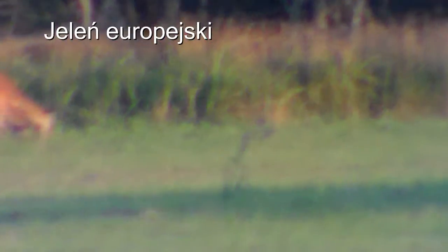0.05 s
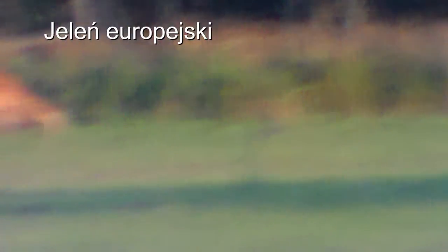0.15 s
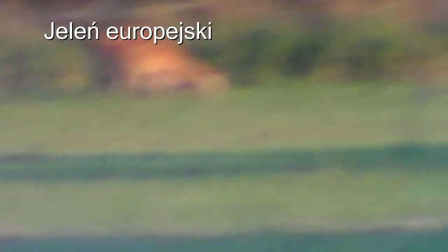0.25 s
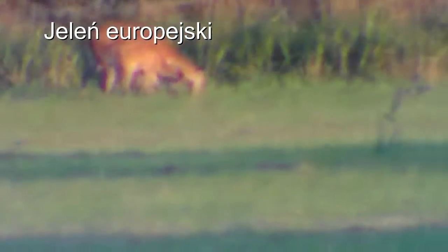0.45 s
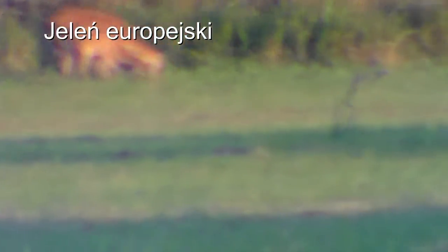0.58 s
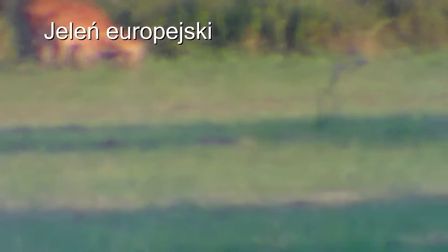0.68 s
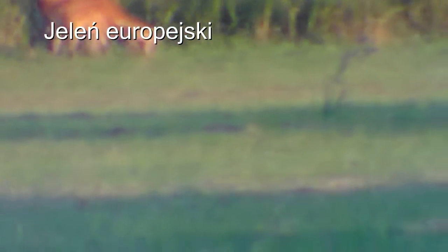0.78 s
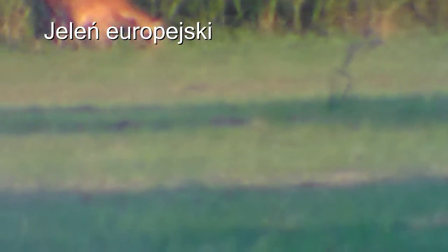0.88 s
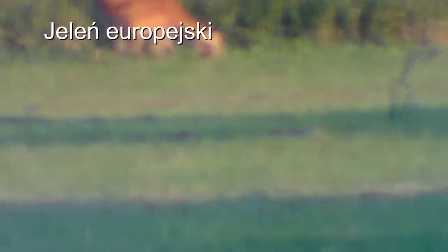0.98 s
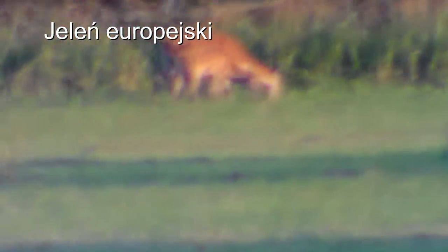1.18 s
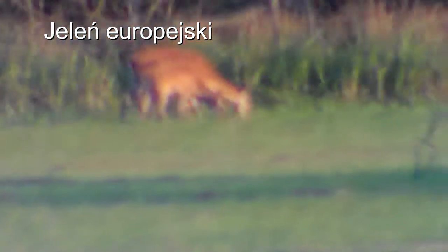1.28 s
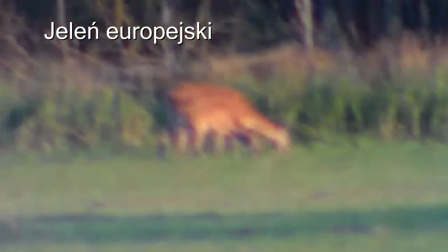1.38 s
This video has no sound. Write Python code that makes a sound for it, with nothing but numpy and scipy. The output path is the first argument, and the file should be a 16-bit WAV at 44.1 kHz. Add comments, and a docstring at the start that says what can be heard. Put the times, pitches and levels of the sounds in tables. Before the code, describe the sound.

Two brief, high deer barks, the second softer, echo lightly over faint outdoor hiss.

```python
"""Deer barking across a field

A deer gives two short, high barks, each arching up in pitch and back, hoarse at its edges: the throat
filters the harmonics of the vocal folds, and turbulent breath excites its resonances. The edge of the
wood answers with echoes, and a few soft rustles follow. Close by, a camera's drive throbs and ticks
faintly over quiet outdoor air, hiss and rumble."""
import sys
import numpy as np
from scipy import signal
from scipy.fft import rfft, irfft, next_fast_len
from scipy.io import wavfile
from scipy.ndimage import map_coordinates

SR = 44100
rng = np.random.default_rng(int(sys.argv[2]) if len(sys.argv) > 2 else 0)


def master_out(mix):
    """Clip the mix to full scale and print it as 16-bit PCM to the path in sys.argv[1]."""
    frames = np.transpose(np.atleast_2d(mix))
    ceiling = np.clip(frames, -1, 1)
    pcm = np.round(ceiling * 32767).astype(np.int16)
    wavfile.write(sys.argv[1], SR, pcm)


N = 63945
TOP_HZ = 14250  # upper band limit


def amp(db):
    """Decibels to amplitude ratio."""
    return 10 ** (np.asarray(db) / 20)


def unit(x):
    """Normalise to rms 1."""
    return x / np.sqrt(np.mean(x ** 2) + 1e-20)


def along(points, hz):
    """Interpolate (frequency [Hz], value) points on a logarithmic frequency axis."""
    f, v = np.transpose(points)
    return np.interp(np.log(hz + 1), np.log(f + 1), v)


def clock():
    """Time [s] at each sample."""
    return np.arange(N) / SR


def wobble(rate):
    """Smooth random modulation: a spline through `rate` Gaussian knots a second."""
    return map_coordinates(rng.standard_normal(N), [clock() * rate])


def filtered(x, response):
    """Linear filtering: the spectrum of x times a frequency response."""
    m = next_fast_len(N + SR // 2)
    return irfft(rfft(x, m) * response(np.fft.rfftfreq(m, 1 / SR)), m)[..., :N]


def strike(start, attack, t60):
    """Envelope of a damped transient: a rise, then exponential decay by 60 dB in t60 seconds."""
    t = np.maximum(clock() - start, 0)
    return (1 - np.exp(-t / attack)) * np.exp(-np.log(1000) * t / t60)


def outdoor_air(level_db=-54, low_cut_hz=53.7):
    """Partly coherent noise: air and hiss widen toward the treble as left-right correlation falls."""
    # noise spectrum: (frequency [Hz], relative spectral density [dB])
    spectrum = [(53, -9), (90, 0), (487, -7.5), (530, -8.5), (577, -10), (958, -12.5), (1130, -13),
                (1730, -14.5), (3130, -16.5), (3620, -16), (4030, -17.5), (14000, -22)]
    # likeness of left and right: (frequency [Hz], correlation [0-1])
    coherence = [(60, 0), (150, 0.61), (400, 0.36), (1200, 0.14), (4000, 0.08), (12000, 0)]

    def mid_side_response(f):
        angle = np.arccos(along(coherence, f)) / 2
        colour = amp(along(spectrum, f)) * f / np.hypot(f, low_cut_hz) * (f < TOP_HZ)
        return colour * np.array([np.cos(angle), np.sin(angle)])

    mid, side = filtered(rng.standard_normal((2, N)), mid_side_response)
    return amp(level_db) * unit(np.array([mid + side, mid - side]))


def rumble(level_db=-59.5, edge_hz=44.6):
    """Incoherent low-frequency noise: a faint rumble, independent in each channel."""
    noise = rng.standard_normal((2, N))
    return amp(level_db) * unit(filtered(noise, lambda f: f / (1 + (f / edge_hz) ** 4)))


def drive_throb(first_s=.035, period_s=.03995, full_from_s=.13, width_s=.0037):
    """A pulse train: the camera's drive beats in smooth Gaussian pulses, heard as a low throb."""
    t = clock()
    pulses = np.zeros(N)
    for beat in np.arange(first_s, t[-1], period_s):
        db = -40.5 - 6 * (beat < full_from_s) + rng.normal(0, 1)  # the first beats are weaker
        centre = beat + rng.normal(0, .0015)
        pulses -= amp(db) * np.exp(-.5 * ((t - centre) / width_s) ** 2)
    return filtered(pulses, lambda f: f ** 2 / (f ** 2 + 10 ** 2))  # 10 Hz high-pass


def bark(contour, throat, rasp, ending, voice_db, rasp_db, rasp_follows, puff_depth):
    """Source and filter: the throat shapes vocal-fold harmonics and breath puffed out once a cycle."""
    clear_hz, hoarse_db_per_octave = 516, 16.5  # the lower the pitch, the hoarser the voice
    jitter, shimmer_db, knots_per_s = .00427, .65, 260  # pitch and level scatter at the clear pitch
    edge_s, ring_rise_s, flutter_hz, flutter_grow_s = .0055, .0045, 76.6, .018
    dispersion_rad = .675  # the throat delays each harmonic more than the last
    t = clock()
    times, *columns = np.transpose(contour)
    pitch, level, tilt, breath_db = [np.interp(t, times, column) for column in columns]
    ending_s, ring_hz, ring_width, ring_db, flutter_depth = ending
    late = t - ending_s
    outside_s = np.maximum(np.maximum(times[0] - t, t - times[-1]), 0)
    gate = np.exp(-(outside_s / edge_s) ** 2)
    hoarse = amp(hoarse_db_per_octave * np.log2(clear_hz / pitch))
    phase = 2 * np.pi * np.cumsum(pitch * (1 + jitter * hoarse * wobble(knots_per_s))) / SR

    k = np.arange(1, 15)[:, None]  # harmonic numbers
    ring_onset = .5 * (1 + np.tanh(late / ring_rise_s))
    ring = ring_db * np.exp(-((k * pitch - ring_hz) / ring_width) ** 2) * ring_onset
    gains = amp(along(throat, k * pitch) + tilt * np.log2(k) + ring)
    gains /= np.sqrt(np.sum(gains ** 2, 0) / 2)  # unit total power
    voice = np.sum(gains * np.cos(k * phase - dispersion_rad * k ** 2), 0)
    flutter_onset = np.clip(late / flutter_grow_s, 0, 1) ** 2
    voice *= 1 - flutter_depth * flutter_onset * np.sin(2 * np.pi * flutter_hz * late)
    voice *= amp(level + voice_db + shimmer_db * hoarse * wobble(knots_per_s))

    puffs = rng.standard_normal(N) * (1 + puff_depth * np.cos(phase))
    breath = filtered(puffs, lambda f: sum(amp(db) / (1 + ((f - hz) / w) ** 2) for hz, w, db in rasp))
    peak_db = level.max()
    breath_gain = hoarse * amp(peak_db + rasp_db + breath_db + rasp_follows * (level - peak_db))
    return gate * (voice + gate * breath_gain * unit(breath))


def open_mouth_bark():
    """Formants of a wide-open mouth: the first bark is strongest near 1300 Hz."""
    # course of the call: (time [s], pitch [Hz], level [dB], tilt [dB/octave], breath offset [dB])
    contour = [(0.187, 395.3, -46, -15, -9), (0.203, 476.4, -38.5, -6, 2), (0.219, 521.4, -34.5, 1.5, 3),
               (0.249, 535.7, -26.5, -3.5, 3), (0.275, 526.6, -24, 5, 2), (0.289, 492.5, -29.5, -3.5, 5.5)]
    # vocal-tract response: (frequency [Hz], relative gain [dB])
    throat = [(350, -40), (540, -20), (800, -28), (1070, -4), (1300, 9), (1580, 1), (1850, -3.5),
              (2130, -25.5), (2500, -32.5), (2690, -23), (3000, -44), (5500, -50), (9000, -81)]
    # resonances excited by breath: (frequency [Hz], half width [Hz], relative gain [dB])
    rasp = [(635.5, 32, 3.5), (1180, 52, -2), (1576, 120, 5), (2130, 120, -3), (2600, 160, -7),
            (3400, 180, -23), (5940, 2200, -23.5)]
    # closing resonance and flutter: (onset [s], frequency [Hz], width [Hz], boost [dB], depth [0-1])
    ending = (.264, 2500, 190, 7.7, 0.3)
    return bark(contour, throat, rasp, ending,
                voice_db=-.5, rasp_db=-20.5, rasp_follows=.41, puff_depth=.25)


def half_open_bark():
    """A narrower opening lowers the formants: the second, softer bark has its main one near 680 Hz."""
    # course of the call: (time [s], pitch [Hz], level [dB], tilt [dB/octave], breath offset [dB])
    contour = [(0.547, 323.6, -55, 0.0, 0.0), (0.559, 368.6, -46.5, 0.0, 0.0),
               (0.571, 400.6, -41, 0.0, 0.024), (0.589, 511.4, -42.5, 0.0, 0.0),
               (0.615, 545, -35.5, 0.0, 0.0), (0.639, 507.8, -39.5, 0.0, 0.0),
               (0.661, 422, -45, 0.0, 0.029), (0.667, 403.5, -42, 0.0, 0.0)]
    # vocal-tract response: (frequency [Hz], relative gain [dB])
    throat = [(400, -31), (490, -4), (540, -2.5), (680, 17), (840, -0.5), (970, 4.5), (1070, -5),
              (1230, -3.5), (1380, -11), (1600, -4), (1850, -33), (2150, -17), (2400, -18), (2650, -23.5),
              (3200, -33), (7000, -52)]
    # resonances excited by breath: (frequency [Hz], half width [Hz], relative gain [dB])
    rasp = [(580, 70, -10), (850, 100, 10.5), (1200, 66, 2), (1560, 130, -1), (2506, 380, -11)]
    # closing resonance and flutter: (onset [s], frequency [Hz], width [Hz], boost [dB], depth [0-1])
    ending = (.646, 1150, 110, 8.1, 0.12)
    return bark(contour, throat, rasp, ending,
                voice_db=0, rasp_db=-15.5, rasp_follows=.47, puff_depth=.27)


def field(call, tail_rise_s=.0087, left_lag_s=.00005):
    """Reflection and scattering: the direct call, echoes from the wood's edge, a tail from its trunks."""
    # echoes from the trees: (delay [s], gain [dB], low cutoff [Hz])
    reflections = [(0.019, -19, 1800), (.056, -43, 1500), (.086, -15.5, 101), (.106, -22, 1300)]
    # the grass takes the midrange out of the long path: (frequency [Hz], gain [dB])
    ground_effect = [(520, 2.5), (800, 3), (1070, -8.5), (1550, -1.5), (3000, 3.5)]
    # reverberation of the wood: (frequency [Hz], time to fall 60 dB [s])
    wood_t60 = [(300, 0.34), (1500, 0.45), (3000, 0.34), (8000, 0.18)]
    # the trunks scatter the treble most: (frequency [Hz], gain [dB])
    scattering = [(500, -14), (1100, -16), (1600, -18), (2200, -8), (5500, 4)]
    # stereo balance of the call: (frequency [Hz], left minus right [dB])
    balance = [(500, 1.5), (1100, -3.5), (1600, -3), (2600, 0), (5000, -1.5)]
    sides = np.array([[.5], [-.5]])

    def echo_response(f):
        paths = sum(amp(db) * f ** 2 / (f ** 2 + low_hz ** 2) * np.exp(-2j * np.pi * f * delay)
                    for delay, db, low_hz in reflections)
        return amp(along(ground_effect, f)) * paths

    def stereo_response(f):
        return amp(sides * along(balance, f)) * np.exp(-2j * np.pi * f * sides * left_lag_s)

    hz, t, noise = signal.stft(rng.standard_normal(SR // 2), SR, nperseg=256)
    decay = np.exp(-np.log(1000) * t / along(wood_t60, hz)[:, None])
    rise = 1 - np.exp(-t / tail_rise_s)
    tail = signal.istft(noise * decay * rise, SR, nperseg=256)[1]
    reverberation = signal.fftconvolve(call, tail / np.linalg.norm(tail))[:N]
    scattered = filtered(reverberation, lambda f: amp(along(scattering, f)))
    return filtered(call + filtered(call, echo_response) + scattered, stereo_response)


def rustles():
    """Damped bursts of band-limited noise: soft rustles and a low bump."""
    # noise bursts: (time [s], gain [dB], attack [s], t60 [s], centre [Hz], width [octaves])
    bursts = [(.247, -41, 0.0007, 0.013, 3950, 1.2), (0.714, -47.5, 0.0027, 0.24, 1650, 1.4),
              (0.819, -45, 0.0041, 0.12, 1420, 0.87), (1.105, -42.5, 0.0041, 0.062, 197, 2.03)]
    out = np.zeros(N)
    for start, db, attack, t60, hz, octaves in bursts:
        noise = rng.standard_normal(N)
        band = filtered(noise, lambda f: 1 / (1 + (np.log2((f + 1) / hz) / octaves) ** 2) ** 2)
        out += amp(db) * unit(band) * strike(start, attack, t60)
    return out


def drive_ticks(first_s=.328, period_s=.08, attack_s=.0018, t60_s=.045):
    """Damped modes: the camera's drive rings with a small double tick at about half the throb's rate."""
    # ringing modes of the drive: (frequency [Hz], gain [dB])
    modes = [(1785, -50.5), (3600, -50)]
    second_stroke_s, second_stroke_db = .023, -6.5
    rattle_rad, knots_per_s = .67, 240  # random phase modulation roughens the ring
    t = clock()
    out = np.zeros((2, N))
    for start in np.arange(first_s, t[-1], period_s):
        envelope = strike(start, attack_s, t60_s)
        envelope += amp(second_stroke_db) * strike(start + second_stroke_s, attack_s, t60_s)
        for hz, db in modes:
            rattle = rattle_rad * np.array([wobble(knots_per_s), wobble(knots_per_s)])
            gain = amp(db + 2 * rng.standard_normal((2, 1)))
            out += envelope * gain * np.sin(2 * np.pi * hz * (t - start) + rattle)
    return out


def scene():
    """Superposition: both barks carried across the field, added to the near sounds."""
    barks = field(open_mouth_bark() + half_open_bark())
    return barks + outdoor_air() + rumble() + rustles() + drive_throb() + drive_ticks()


def record(dry):
    """An ideal low-pass filter: the camera passes nothing above its band limit."""
    return filtered(dry, lambda hz: hz < TOP_HZ)


dry = scene()
out = record(dry)
master_out(out)
```